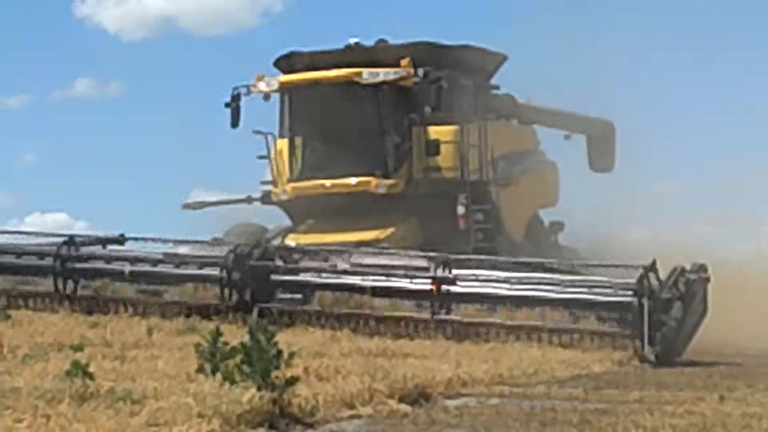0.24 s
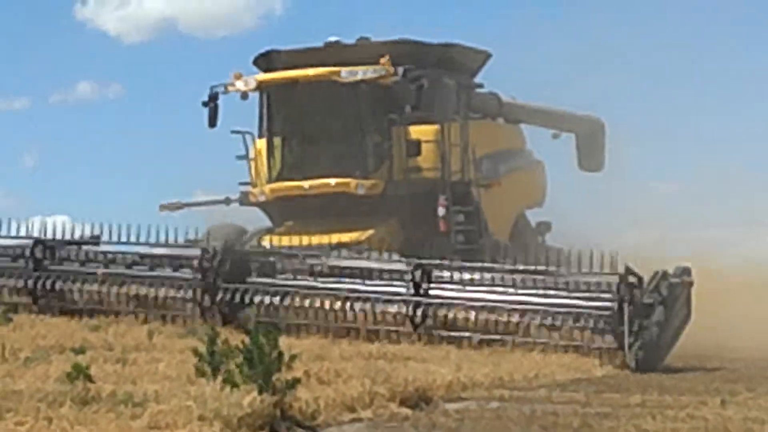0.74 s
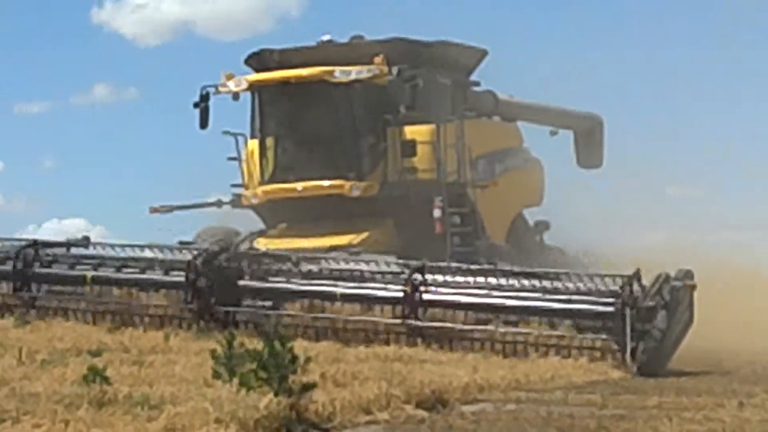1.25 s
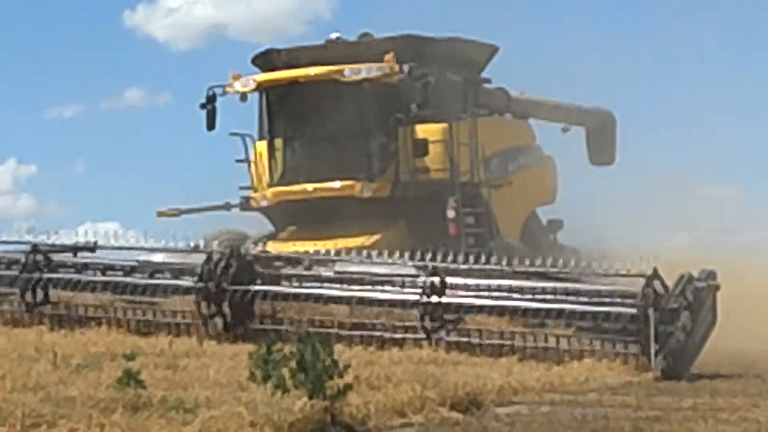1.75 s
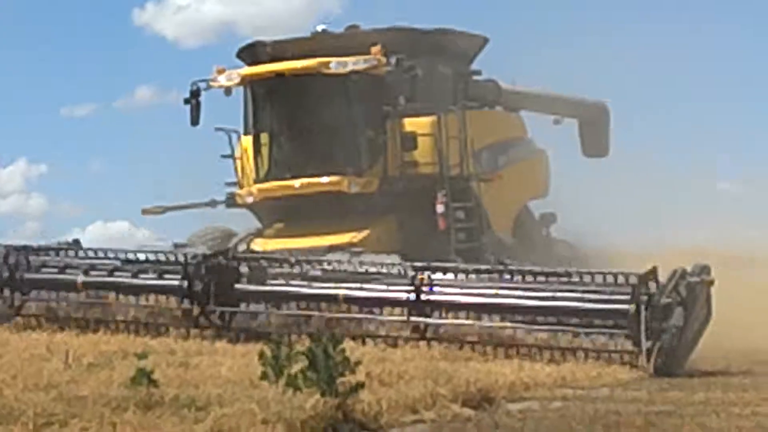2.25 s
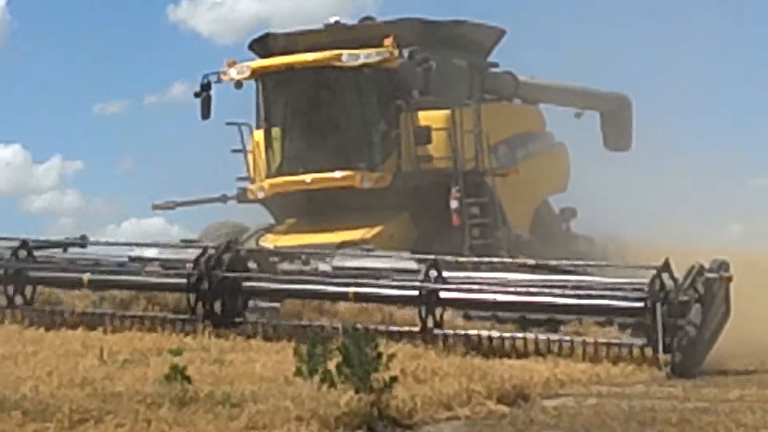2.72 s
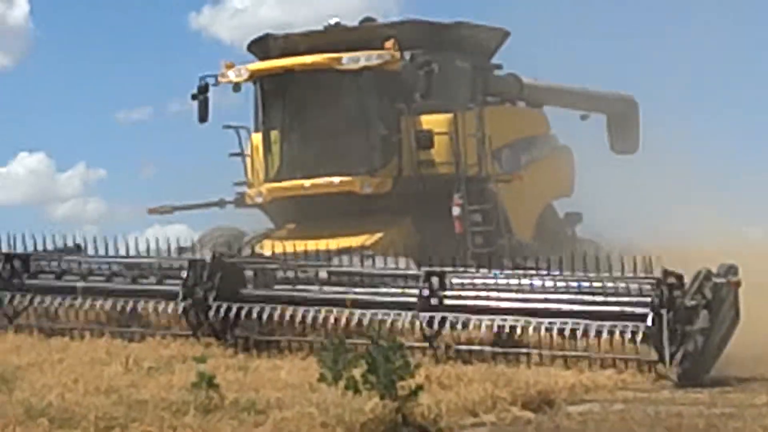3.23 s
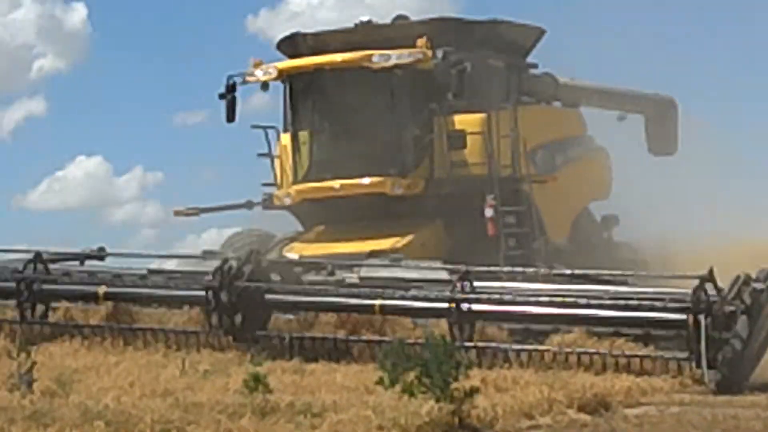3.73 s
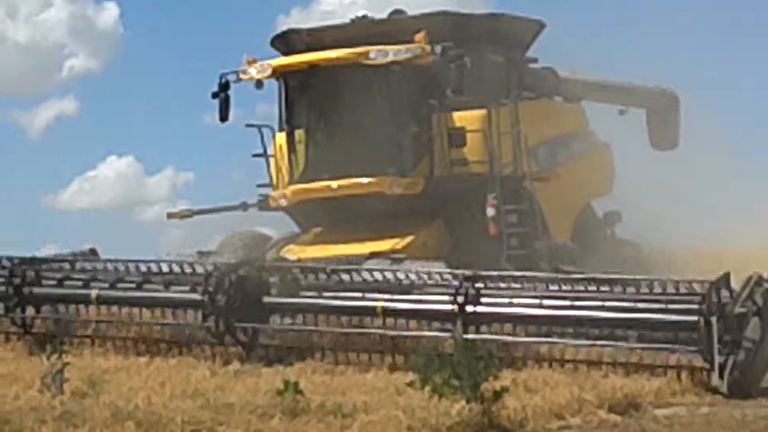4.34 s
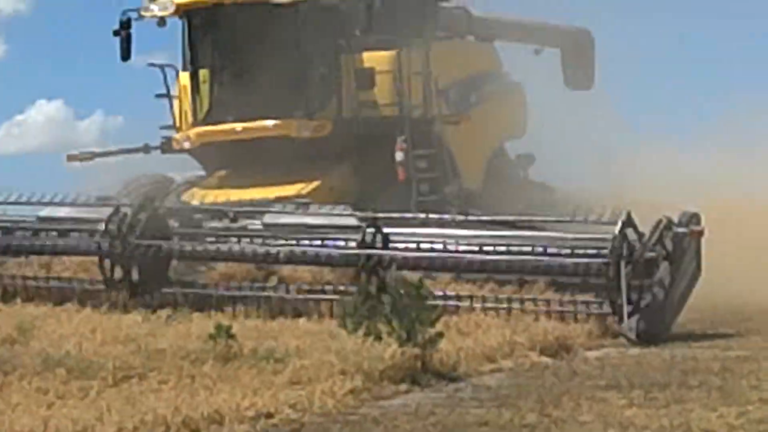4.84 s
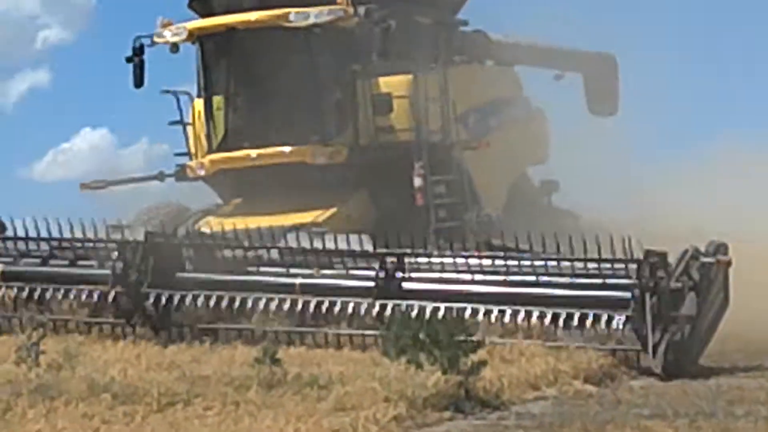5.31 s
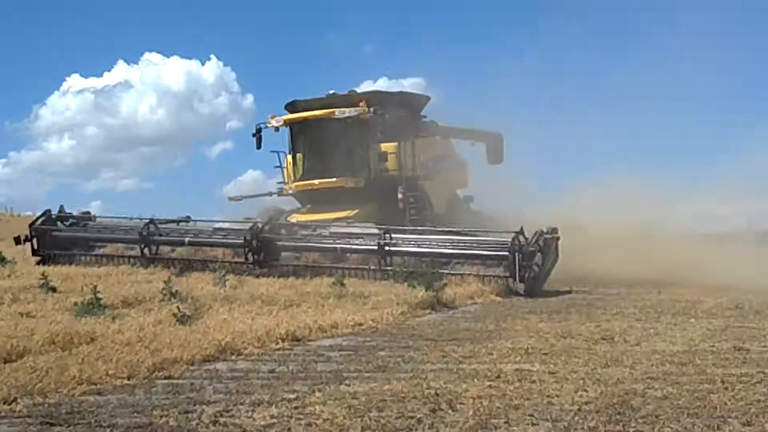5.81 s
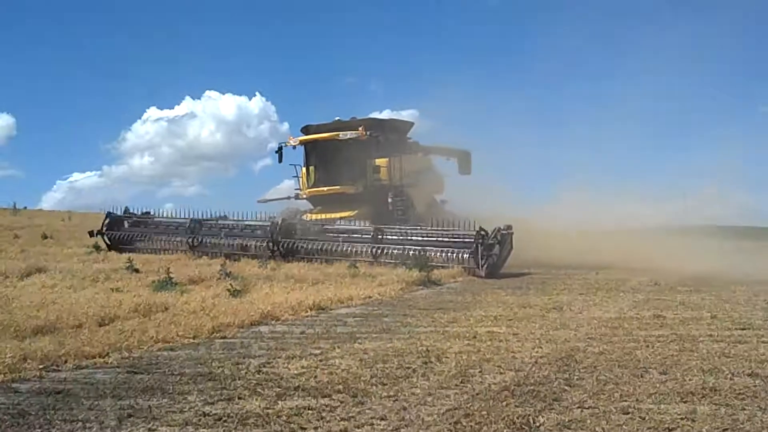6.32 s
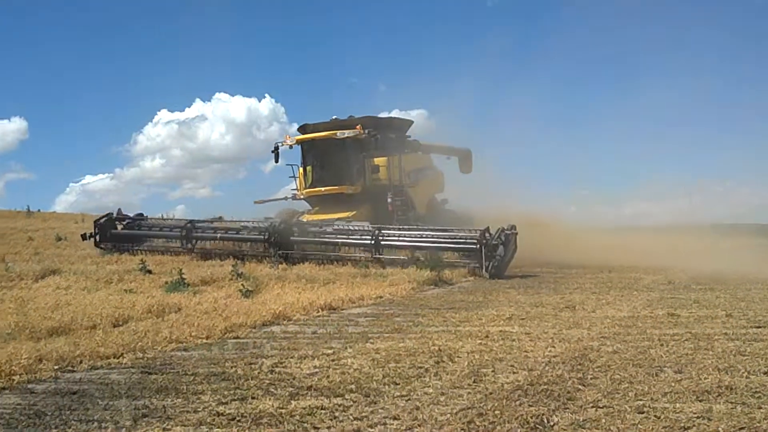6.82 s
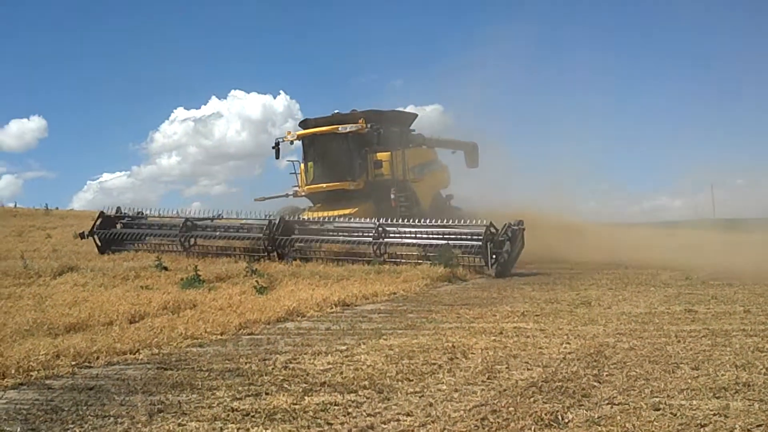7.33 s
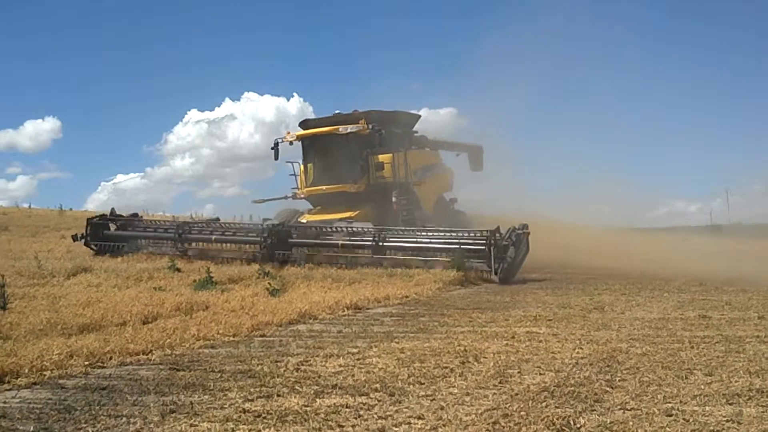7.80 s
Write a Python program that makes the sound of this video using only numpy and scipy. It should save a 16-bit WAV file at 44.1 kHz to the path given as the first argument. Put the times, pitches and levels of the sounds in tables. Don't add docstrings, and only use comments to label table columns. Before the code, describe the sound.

Outdoors in an open field, a combine harvester works some way off: low engine hum, broad roar, a wavering mid-pitched fan moan and a rapid pulsing knife hiss. Wind rumbles and bursts against the right side of the microphone, densest in the middle and around five seconds, and the machine briefly dips in level as gusts hit, then climbs back.

```python
import sys
import numpy as np
from scipy import signal
from scipy.fft import rfft, irfft
from scipy.io import wavfile
from scipy.ndimage import uniform_filter1d

SR = 44100
rng = np.random.default_rng(int(sys.argv[2]) if len(sys.argv) > 2 else 0)


def invert_db(level):
    return 10 ** (np.asarray(level, dtype=float) / 20)


def to_wav(s):
    ch = np.atleast_2d(s).T
    pcm = np.round(np.clip(ch, -1, 1) * 32767)
    wavfile.write(sys.argv[1], SR, pcm.astype(np.int16))


N = 355446


def evened(x):
    return x / np.sqrt(np.mean(x ** 2) + 1e-20)


def read(points, hz, col=1):
    table = np.transpose(points)
    return np.interp(np.log(hz + 1), np.log(table[0] + 1), table[col])


def drift(per_s, shape=(N,), sr=SR):
    b, a = signal.butter(2, min(per_s / sr * 2, 0.9))
    return evened(signal.lfilter(b, a, rng.standard_normal(shape)))


def coloured(gain, channels=1):
    hz = np.fft.rfftfreq(N, 1 / SR)
    white = rng.standard_normal((channels, N))
    return irfft(rfft(white) * gain(hz), N)


def gain_db(t):
    # time in seconds, roar level it falls to in dB.
    knocks = [(0.0, -49), (1.05, -36), (1.17, -40.5), (1.5, -40.5), (1.8, -49), (2.0, -48), (2.31, -51.5),
              (3.1, -44.5), (3.3, -43), (3.68, -43), (3.78, -42), (4.15, -44), (4.4, -42), (4.6, -40.5),
              (4.95, -41), (5.025, -48.5), (5.28, -48.5), (5.48, -49.5), (5.72, -49.5), (5.9, -47.5),
              (6.765, -45), (7.1, -42.5), (7.36, -42), (7.55, -41.5), (7.76, -41.5), (7.86, -42)]
    recover_db_per_s, ceiling_db, fall_s = 11.5, -38.5, 0.054
    knock_s, low_db = np.transpose(knocks)[:, :, None]
    climb_db = np.minimum(low_db + recover_db_per_s * (t - knock_s), ceiling_db)
    knocked = np.clip((t - knock_s) / fall_s + 1, 0, 1)
    return (ceiling_db + knocked * (climb_db - ceiling_db)).min(0)


def roar_and_whines(hz):
    # frequency in Hz, level in dB per Hz.
    roar_points = [(40, 18), (90, 19.5), (170, 26.5), (340, 8.5), (700, 9.5), (1300, 6.5), (2150, 2),
                   (2450, -0.5), (4700, -3), (6200, -3.5), (7100, -8.5), (8500, -2.5), (11500, -12.5),
                   (15500, -14)]
    # frequency in Hz,
    # width in Hz, level in dB.
    resonances = [(543, 155, 20), (526, 16.4, 21), (703, 21, 12), (850, 29, 12), (1064, 110, 9.5),
                  (1284, 61, 4), (1587, 48, 8.5), (1741, 38, 9.5), (1885, 150, 7.5), (2030, 39, 5.5),
                  (2127, 11, 9), (2980, 6.5, -14), (3820, 1150, -1), (5740, 420, 0)]
    roar_power = invert_db(read(roar_points, hz)) ** 2
    whine_power = 0
    for centre_hz, width_hz, db in resonances:
        whine_power = whine_power + invert_db(db) ** 2 / (1 + (2 * (hz - centre_hz) / width_hz) ** 2) ** 2
    return np.sqrt(roar_power + whine_power)


def load_and_approach_db(f, t):
    # time in seconds, load in dB.
    crop_load = [(0.0, 1.5), (0.9, -.5), (1.4, 7), (1.65, 2.3), (1.93, 9.5), (2.25, 1), (2.9, 5),
                 (3.22, -6.5), (3.9, 1), (4.5, -3), (5.15, 4.5), (5.47, -3), (5.8, 3.5), (6.44, 3.5),
                 (7.0, -2.5), (7.2, 2.5), (7.72, 7), (8.06, 4.5)]
    load_db = np.interp(t, *np.transpose(crop_load))
    hiss_db = -3.5 + 0.68 * t
    moan_db = 0.76 * load_db
    body_db = -0.5 - 0.2957 * t + 0.27 * load_db
    beads_db = 0.75 * drift(7.3, t.shape, SR / 256)
    hiss_share = np.clip((f - 6500) / 5000, 0, 1)
    moan_share = np.exp(-((f - 545) / 110) ** 2)
    octaves_off = abs(np.log2(f + 1) - np.log2(1150))
    body_share = np.clip(1.3 - octaves_off, 0, 1) * (1 - moan_share)
    return hiss_share * hiss_db + moan_share * (moan_db + beads_db) + body_share * body_db


def straw_and_knife_db(f, t):
    knife_hz, knife_start_turns = 21.15, 0.76
    frame_sr = SR / 256
    patches = evened(uniform_filter1d(drift(4.8, (len(f), len(t)), frame_sr), size=7, axis=0))
    flicker = drift(16, t.shape, frame_sr) * np.clip(3000 / (f + 1), 0.7, 1.6)
    strokes = np.cos(2 * np.pi * (knife_hz * t + knife_start_turns))
    strokes = strokes * (1 + 0.94 * drift(0.51, t.shape, frame_sr))
    return 0.64 * patches + 0.51 * flicker + 0.67 * strokes * np.clip(f / 7000, 0, 1.3)


def past_camera_body(z, f):
    # frequency in Hz, right port level in dB, likeness 0-1, lag in radians.
    shading = [(100, -1.5, 0.94, 0.2), (577, -2, 1, .04), (750, -5, 1, 0.81), (1020, 0, 0.68, 0.6),
               (1644, 1, 0.94, 1.92), (2120, -1, 0.57, 2.95), (2800, -12.5, 0.21, 3.8),
               (4860, 0, 0.21, 2.75), (6070, -7, 0.72, 5.4), (9100, -7, 0, 6.7), (12000, 0, 0, 4.8),
               (15500, 4.5, .1, 6.0)]
    same = np.clip(read(shading, f, col=2), 0, 1)
    late = np.exp(-1j * read(shading, f, col=3))
    mixed = same * late * z[0] + np.sqrt(1 - same ** 2) * z[1]
    return np.array([z[0], invert_db(read(shading, f)) * mixed])


def machine():
    noise = coloured(roar_and_whines, channels=2)
    hz, t, z = signal.stft(noise, SR, nperseg=1024, noverlap=768)
    f = hz[:, None]
    level_db = gain_db(t) + load_and_approach_db(f, t) + straw_and_knife_db(f, t)
    ports = past_camera_body(z, f) * invert_db(level_db + 10.5)
    return signal.istft(ports, SR, nperseg=1024, noverlap=768)[1][:, :N]


def engine():
    # multiple of the firing rate, level in dB.
    orders = [(1, -3.5), (2, -15), (3, -19)]
    firing_hz, shaft_beat_hz, beat_null_s = 103.03, 2.532, 0.84
    shaft_db = orders[0][1] - 4
    t = np.arange(N) / SR
    right_lag_turns = np.array([[0], [0.03]])
    turns = np.cumsum(firing_hz * (1 + 0.002 * drift(3.2))) / SR - right_lag_turns
    tone = sum(invert_db(db) * np.sin(2 * np.pi * k * turns) for k, db in orders)
    shaft_turns = turns + shaft_beat_hz * (t - beat_null_s)
    shaft = -invert_db(shaft_db) * np.sin(2 * np.pi * shaft_turns)
    level_db = gain_db(t) - 1 - 0.27 * t
    port_db = np.array([[17.5], [14.5]])
    return np.sqrt(2) * (tone + shaft) * invert_db(level_db + port_db)


def buffeting_power(t):
    # middle in seconds, level in dB, half length in seconds.
    swell_rows = [(0.012, -25.5, 0.06), (0.297, -34.5, 0.14), (0.423, -27, 0.027), (0.97, -34, 0.19),
                  (1.46, -35, .09), (1.87, -20.5, .16), (2.31, -21, .13), (2.553, -27.5, 0.072),
                  (2.74, -34, .1), (3.125, -31, 0.3), (3.578, -24.5, 0.12), (4.07, -24, 0.085),
                  (4.24, -23.5, 0.03), (4.45, -22.5, 0.16), (4.962, -18, 0.093), (5.067, -20, 0.1),
                  (5.304, -25, 0.13), (5.475, -19, 0.12), (5.66, -18, 0.062), (6.0, -22.5, 0.091),
                  (6.235, -23.5, 0.13), (6.78, -27, 0.22), (6.924, -30, 0.044), (7.08, -33, .06),
                  (7.312, -29.5, 0.12), (7.506, -33, 0.046), (7.744, -33, .08)]
    calm_db, lumps_db, lumps_per_s = -45, 3, 18
    middle_s, db, half_s = np.transpose(swell_rows)[:, :, None]
    gusts = invert_db(db) ** 2 * np.exp(-2 * ((t - middle_s) / half_s) ** 2)
    swells = invert_db(calm_db) ** 2 + gusts.sum(0)
    return swells * invert_db(lumps_db * drift(lumps_per_s, t.shape, SR / 16) - 0.5) ** 2


def burst_powers(t):
    # time in seconds, level in dB, length in ms, brightness in dB.
    puff_rows = [(0.245, -19.5, 15, -19), (0.42, -26, 46, -30), (1.481, -25, 17, -15),
                 (1.728, -16.5, 48, -19), (1.786, -15.5, 12, 1.5), (1.932, -13.5, 25, -6.5),
                 (2.05, -18.5, 45, -11.5), (2.29, -10.5, 18, -8.5), (2.46, -23, 11, -5),
                 (2.806, -22, 16, -24), (2.931, -20, 29, -14), (3.167, -13.5, 31, -12),
                 (3.65, -20, 39, -22), (4.055, -18, 18, -16), (4.14, -11, 33, -25), (4.39, -20, 68, -20),
                 (4.458, -18, 15, -13), (4.671, -20.5, 39, -11), (5.136, -17.5, 53, -5.5),
                 (5.26, -14, 103, -10), (5.362, -19.5, 21, 0), (5.484, -21, 16, 4), (5.813, -13, 70, -11),
                 (5.889, -16.5, 55, -6), (6.254, -22, 47, -20), (6.675, -17, 69, -11), (6.745, -13, 11, -8),
                 (6.834, -17.5, 77, -9.5), (7.357, -10, 12, -11), (7.738, -14.5, 34, -18)]
    burst_s, db, length_ms, bright_db = np.transpose(puff_rows)[:, :, None]
    bursts = invert_db(db - 3.0) ** 2 * np.exp(-(1400 * (t - burst_s) / length_ms) ** 2)
    return bursts.sum(0), (bursts * invert_db(bright_db) ** 2).sum(0)


def eddies(per_s, spread_db):
    chance, size, sign = rng.random((N, 3)).T
    kicks = (chance < per_s / SR) * np.sign(sign - 0.5)
    kicks = kicks * invert_db(-spread_db * np.log(size + 0.012))
    return evened(kicks) + 0.5 * rng.standard_normal(N)


def steadied(x, share, size):
    power = uniform_filter1d(x ** 2, size)
    return evened(x / np.abs(power + 1e-3) ** (share / 2))


def wind():
    # frequency in Hz, level in dB.
    rumble_colour = [(20, -22), (50, -25), (90, -1), (140, 2.5), (250, -3), (350, -14.5), (500, -23.5),
                     (1000, -59)]
    # frequency in Hz, level in dB.
    flutter_colour = [(150, -15), (300, 0), (400, 4), (560, -7), (700, -13), (1000, -16.5), (2000, -56)]
    t = np.arange(0, N + 16, 16) / SR
    steady = buffeting_power(t)
    rumble_bursts, flutter_bursts = burst_powers(t)
    sample_s = np.arange(N) / SR
    low = np.interp(sample_s, t, np.sqrt(steady + rumble_bursts))
    high = np.interp(sample_s, t, np.sqrt(steady * invert_db(-9.5) ** 2 + flutter_bursts))
    hz = np.fft.rfftfreq(N, 1 / SR)
    kicks = rfft(eddies(per_s=350.0, spread_db=2.5))
    rumble = evened(irfft(kicks * invert_db(read(rumble_colour, hz)), N))
    flutter = evened(irfft(kicks * invert_db(read(flutter_colour, hz)), N))
    right = steadied(rumble, 0.82, size=1300) * low + steadied(flutter, 0.19, size=1300) * high
    left_rumble = evened(coloured(lambda hz: invert_db(read(rumble_colour, hz)))[0])
    return np.array([invert_db(-15) * low * left_rumble, right - pops()])


def pops():
    # time in seconds, level in dB.
    snaps = [(1.784, -9), (1.819, -14), (1.93, -19), (1.972, -17), (2.293, -15), (2.457, -13), (4.894, -12),
             (4.999, -6.5), (5.144, -22), (5.207, -20), (5.292, -12), (5.356, -12), (5.453, -7.5),
             (5.53, -10.5), (5.62, -13), (5.71, -11), (5.787, -10.5), (5.81, -14), (6.676, -16),
             (6.738, -16), (7.522, -4.5)]
    pop_hz = 510
    t = np.arange(N) / SR
    out = np.zeros(N)
    for snap_s, db in snaps:
        since_s = t - snap_s
        out += invert_db(db) * np.cos(2 * np.pi * pop_hz * since_s) * np.exp(-(2.74 * pop_hz * since_s) ** 2)
    return out


def scene():
    return machine() + engine() + wind()


def top_cut(x):
    return signal.sosfilt(signal.butter(12, 15880, fs=SR, output="sos"), x)


def record(dry):
    cross_delay_samples, bass_cut_hz, edge_hz = 16, 90, 15725
    late_other = np.pad(dry, ((0, 0), (cross_delay_samples, 0)))[::-1, :N]
    bass_cut = signal.butter(1, bass_cut_hz, "high", fs=SR, output="sos")
    wide = signal.sosfilt(bass_cut, dry - late_other)
    band_limit = signal.firwin(1023, edge_hz, window=("kaiser", 9), fs=SR)
    mix = signal.oaconvolve(wide, band_limit[None], "same")
    return top_cut(mix)


dry = scene()
out = record(dry)
to_wav(out)
```